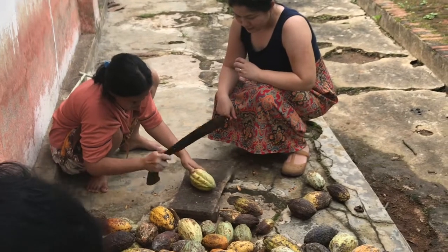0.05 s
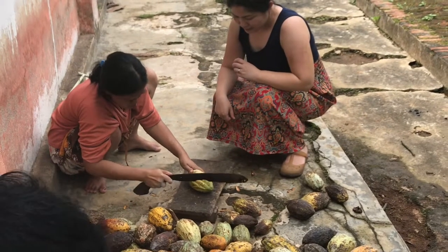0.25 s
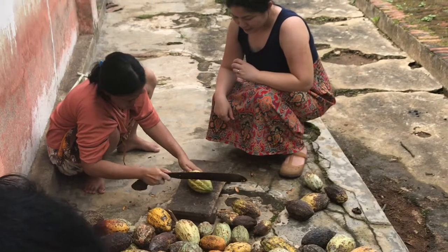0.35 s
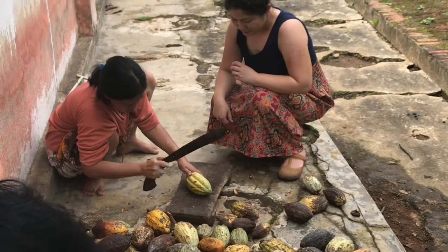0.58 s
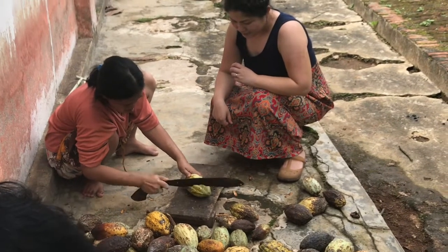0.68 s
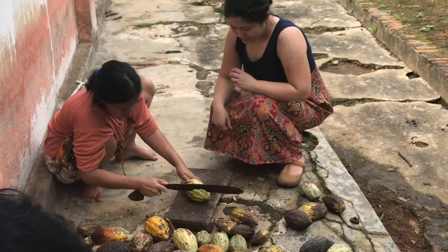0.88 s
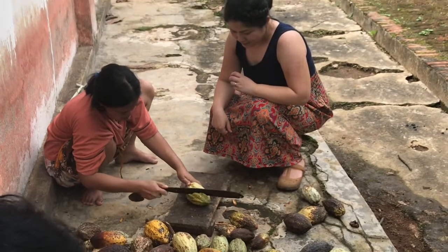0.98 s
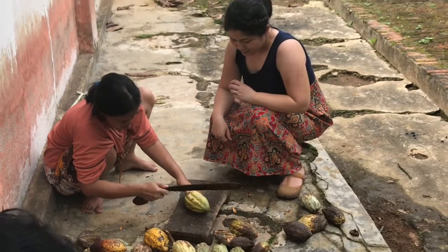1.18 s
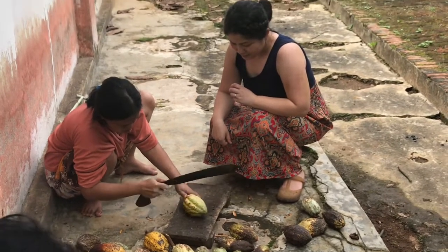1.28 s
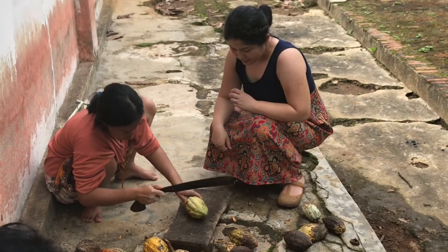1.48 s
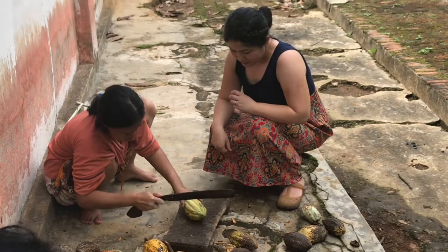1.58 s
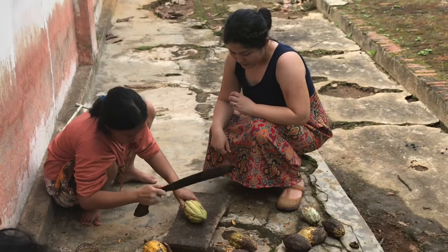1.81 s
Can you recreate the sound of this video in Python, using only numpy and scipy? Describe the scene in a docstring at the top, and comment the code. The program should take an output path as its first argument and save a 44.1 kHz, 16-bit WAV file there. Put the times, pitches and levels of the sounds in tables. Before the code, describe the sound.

Two sharp, uneven machete blows crack a hard husk, with small ticks and a faint hum

```python
"""In a paved yard a machete chops twice into a hard fruit pod held on a wooden board.
Each blow is random snaps, a split of noise and a thud of ringing modes, closely overlapping; walls answer briefly.
Small noise ticks of blade and husk come before, between and after the blows; late on, a ping of sines and soft rubs.
Throughout, a far engine hums in sines; noise bands make shrill insects, air, rustle and faint ticking."""
import sys
import numpy as np
from scipy import signal
from scipy.fft import rfft, irfft
from scipy.io import wavfile
from scipy.ndimage import uniform_filter1d

SR = 44100
rng = np.random.default_rng(int(sys.argv[2]) if len(sys.argv) > 2 else 0)


def waveform_to_disk(signal):
    """Save audio, clipped to [-1, 1], as 16-bit WAV at the path in sys.argv[1]."""
    frames = np.transpose(np.atleast_2d(signal))
    scaled = np.clip(frames, -1, 1) * 32767
    samples = np.round(scaled).astype(np.int16)
    wavfile.write(sys.argv[1], SR, samples)


N = 81585
T = np.arange(N) / SR


def from_db(db):
    """Decibels to gain."""
    return 10 ** (np.asarray(db) / 20)


def rms_one(x):
    """Scale to unit RMS level."""
    return x / np.sqrt(np.mean(x ** 2) + 1e-20)


def in_time(rows, axis=1):
    """One column of a time curve, drawn in straight lines through every sample."""
    rows = np.array(rows)
    return np.interp(T, rows[:, 0], rows[:, axis])


def at_hz(rows, hz, axis=1):
    """One column of a spectrum at given frequencies, interpolated over log frequency."""
    rows = np.array(rows)
    log_hz = np.log(np.maximum(hz, 1))
    return np.interp(log_hz, np.log(rows[:, 0]), rows[:, axis])


def dying(start, t60):
    """Sudden start, then exponential decay by 60 dB in t60 seconds."""
    age = np.maximum(T - start, 0)
    return (T >= start) * np.exp(-np.log(1000) * age / t60)


def ring(start, hz, t60):
    """A struck mode: a sine that dies away."""
    return dying(start, t60) * np.sin(2 * np.pi * hz * (T - start))


def band(x, low, high, order=2):
    """Band-pass whose upper edge stays within 9/20 of the sample rate."""
    edges = [low, min(high, SR * 9 / 20)]
    return signal.sosfilt(signal.butter(order, edges, "band", fs=SR, output="sos"), x)


def noise(low, high, order=2):
    """Band of noise at unit level."""
    return rms_one(band(rng.standard_normal(N), low, high, order=order))


def noise_around(hz, width):
    """Noise from hz / width to hz * width, never narrower than a width of 1.02."""
    width = max(width, 1.02)
    return noise(hz / width, hz * width)


def causal(x, gain):
    """Minimum-phase filter with the given gains from 0 to half the sample rate."""
    cepstrum = irfft(np.log(gain))[:N]
    response = np.exp(2 * rfft(cepstrum, 2 * N) - cepstrum[0])
    return irfft(rfft(x, 2 * N) * response)[:N]


def colour(x, rows, axis=1):
    """Give a spectrum to a sound, at unit power gain."""
    hz = np.arange(N + 1) * SR / (2 * N)
    return causal(x, rms_one(from_db(at_hz(rows, hz, axis=axis))))


def even(x, size=1200):
    """Smooth the chance peaks out of a burst's spectrum, so that it has no pitch of its own."""
    power = uniform_filter1d(np.abs(rfft(x, 2 * N)) ** 2, size)
    return causal(x, np.sqrt(power.mean() / power))


def engine():
    """Low orders of a far engine: sines at multiples of its cycle rate, each wavering in level."""
    # cycle rate: (time [s], rate [Hz])
    cycle_rate = [(0, 31.55), (.35, 30.78), (.7, 30.2), (.95, 31.57), (1.25, 30.22), (1.85, 29.68)]
    # levels of the orders: (time [s], order 2 [dB], order 3 [dB], order 4 [dB], order 5 [dB], order 6 [dB])
    order_levels = [(0, -48.5, -55.5, -58, -52.5, -62), (.2, -52, -48, -52.5, -46, -61),
                    (.5, -58.5, -51, -44, -52, -77), (.7, -50, -57, -46.5, -60, -58),
                    (.95, -54, -55.5, -57, -52, -65.5), (1.2, -54, -52.5, -52.5, -49, -59),
                    (1.45, -58.5, -61.5, -69, -53, -64.5), (1.85, -54.5, -66, -73, -57.5, -60)]
    # throb of uneven firing: (time [s], depth [share of level])
    throb_depth = [(.15, 0.065), (.32, 1), (.66, 0.85), (.85, 0.089)]
    throb_hz, throb_peak_s = 15.16, 0.4507
    waver_db, waver_hz = 1.5, 6.67   # RMS of the random points; two points per waver cycle
    cycles = np.cumsum(in_time(cycle_rate)) / SR
    throb = 1 + in_time(throb_depth) * np.cos(2 * np.pi * throb_hz * (T - throb_peak_s))
    hum = 0
    for column in range(1, len(order_levels[0])):
        order = column + 1
        waver = np.interp(T * 2 * waver_hz, np.arange(100), rng.standard_normal(100))
        tone = np.sqrt(2) * np.sin(2 * np.pi * (order * cycles + rng.random()))   # unit RMS
        level = from_db(in_time(order_levels, axis=column) + waver_db * waver)
        # order 2 alone does not throb
        hum = hum + level * tone * (throb if order > 2 else 1)
    return hum


def insects():
    """A narrow shrill band of noise, its level drifting slowly."""
    # (time [s], level [dB])
    shrill_level = [(0, -67), (.7, -70.5), (1.1, -68), (1.85, -68.5)]
    return from_db(in_time(shrill_level)) * noise(5250, 5573, order=3)


def air():
    """Outdoor rumble as steady coloured noise, with a soft rustle that swells and fades."""
    # colour of the rumble: (frequency [Hz], relative density [dB per Hz])
    air_colour = [(25, -28), (50, 6.5), (110, -3), (180, -5), (280, -10), (450, -21), (900, -23),
                  (2000, -33), (4500, -37), (8000, -53), (10500, -46.5), (14000, -32), (16000, -38)]
    # soft rustle: (time [s], level [dB])
    rustle_level = [(0, -78), (.15, -71), (.4, -63.5), (.7, -65.5), (.95, -73), (1.85, -76.5)]
    rumble = from_db(-52) * colour(rng.standard_normal(N), air_colour)
    rustle = from_db(in_time(rustle_level)) * noise(1390, 9200)
    return rumble + rustle


def interference():
    """Faint, very high and regular ticking, probably electrical: short decaying bursts of noise."""
    first_s, period_s, t60_s, level_db = 0.058, 0.1023, 0.0071, -55.5
    pulses = sum(dying(start, t60_s) for start in np.arange(first_s, T[-1], period_s))
    return from_db(level_db) * pulses * noise(11900, 15500)


def handling():
    """Ticks of blade and husk, the ping of the freed blade's modes, and the pod rubbing on the board."""
    # small ticks: (start [s], level [dB], centre [Hz], t60 [s], band edge over centre [ratio])
    tick_list = [(0.166, -51, 7000, 0.027, 2.5), (0.3832, -52, 2540, .03, 1.5),
                 (0.4595, -40.5, 5340, 0.017, 1.41), (0.4646, -50, 1980, 0.038, 1.66),
                 (0.6211, -54, 2300, 0.039, 1.6), (0.648, -54.5, 6000, 0.031, 3.3),
                 (0.6871, -44, 2950, 0.014, 1.12), (0.688, -52, 2500, 0.021, 3.5),
                 (0.9946, -52.5, 10200, 0.014, 1.23), (1.126, -56, 8260, 0.057, 3.2),
                 (1.2428, -59.5, 1440, 0.042, 1.02), (1.324, -68, 10000, 0.06, 1.2),
                 (1.471, -59, 2780, 0.032, 1.35)]
    # modes of the free blade: (frequency [Hz], level [dB], t60 [s])
    blade_modes = [(10130, -63, .15), (11690, -66, .11), (14410, -62, .11)]
    ping_s = 1.129
    # shifts of the pod: (middle [s], Gaussian spread [s], level [dB], centre [Hz],
    # band edge over centre [ratio])
    rub_list = [(1.131, 0.043, -60.5, 694, 1.45), (1.151, 0.061, -56, 342, 1.09),
                (1.438, 0.015, -63.5, 1180, 1.4), (1.46, 0.019, -67.5, 1747, 1.025),
                (1.485, 0.018, -61.5, 863, 1.076), (1.447, 0.018, -68, 4800, 1.9),
                (1.549, 0.0075, -68, 3320, 1.04), (1.551, 0.019, -67, 5000, 2.05),
                (1.562, 0.024, -63.5, 1000, 1.57)]
    ticks = sum(from_db(db) * dying(start, t60) * noise_around(hz, width)
                for start, db, hz, t60, width in tick_list)
    ping = sum(from_db(db) * ring(ping_s, hz, t60) for hz, db, t60 in blade_modes)
    rubs = sum(from_db(db) * np.exp(-.5 * ((T - middle) / spread) ** 2) * noise_around(hz, width)
               for middle, spread, db, hz, width in rub_list)
    return ticks + ping + rubs


def chops():
    """Fibres snap while the blade sinks in, the husk splits, and pod and board ring: (cracks, thuds)."""
    # blows: (start [s], crack level [dB], rise [s], tearing time [s], thud delay [s],
    # thud level [dB], split delay [s], split level [dB])
    blows = [(0.2212, -19, 0.0051, 0.0076, 0.0071, -18.5, .0052, -9),
             (0.7413, -20.5, 0.00026, 0.0081, 0.002593, -23.5, 0.0098, -19)]
    # colour of the crack: (frequency [Hz], first chop [relative dB], second chop [relative dB])
    husk_colour = [(142, -8, 4.5), (510, 12.5, 0), (1400, 1, 5), (1870, 0.5, -5), (2220, 5, -1),
                   (3150, 5.5, 3), (4960, -1.5, -3.5), (5860, 4, 6), (7860, 1.5, -4), (10900, 3, -2.5),
                   (15260, -6.5, -9)]
    # modes of pod, board and blade: (frequency [Hz], t60 [s], first chop [relative dB],
    # second chop [relative dB])
    body_modes = [(204, 0.08, -9.5, -5), (263.2, 0.1, -1.5, -21), (296.6, 0.17, -8, -9),
                  (367, 0.1, -38, -7.5), (381.3, .11, -6.5, -11.5), (434.2, 0.13, -15.5, -20),
                  (483, 0.07, -12.5, -4), (599, .125, -6, -5), (628, .15, -6.5, -13.5),
                  (670, 0.15, -13, -9.5), (722, 0.085, -5, -14), (744.6, 0.22, -19.5, -13),
                  (831, 0.043, -1, -6.5), (875, 0.059, 2.5, -3), (1026, 0.087, -23, -6.5),
                  (1278, 0.1, -14.5, -20), (1423, 0.065, -12, -0.5), (2356, 0.032, -7.5, -5),
                  (2942, 0.039, -31, -4.5), (3570, 0.041, -9, -40), (5960, .07, -24, -36),
                  (5340, 0.05, -19.5, -27), (10960, .12, -45, -24), (10550, 0.04886, -22, -30),
                  (11300, .05, -19, -5)]
    snaps_per_s, snap_spread_db = 9000, 2   # average rate; average step above the weakest snap
    crack_t60_s, split_t60_s = 0.0081, 0.0041
    contact_s = 0.00096   # the thud fades in over this time
    cracks, thuds = np.zeros((2, N))
    for k, (start, crack_db, rise, tearing, delay, thud_db, split_delay, split_db) in enumerate(blows):
        hits = (rng.random(N) < snaps_per_s / SR) * rng.choice([-1, 1], N)
        snaps = hits * from_db(snap_spread_db * np.minimum(rng.exponential(1, N), 4))
        # the force builds up, holds until the tearing ends, then dies away
        onset = np.clip((T - start) / rise, 0, 1) ** 0.89
        force = onset * from_db(-60 * np.maximum(T - start - tearing, 0) / crack_t60_s)
        tear = even(rms_one(snaps) * force)
        split = from_db(split_db) * dying(start + split_delay, split_t60_s) * noise(3800, 19845, order=1)
        cracks += from_db(crack_db) * colour(tear, husk_colour, axis=k + 1) + split
        thud_s = start + delay
        body = sum(from_db(dbs[k]) * ring(thud_s, hz, t60) for hz, t60, *dbs in body_modes)
        thuds += from_db(thud_db) * body * np.clip((T - thud_s) / contact_s, 0, 1)
    return cracks, thuds


def yard(x):
    """Quick scatter from ground and wall, then a noise tail that dies band by band."""
    # tail: (frequency [Hz], level [dB], t60 [s])
    tail_colour = [(150, -4, 0.13), (343, -7, 0.34), (620, -3.5, 0.36), (880, -9.5, 0.21),
                   (1520, -11, 0.29), (4030, -15.5, 0.34), (9100, -18.5, 0.3), (15000, -21, 0.52)]
    early_db, early_t60_s, early_delay_s = -10, 0.11, 0.004
    # sparse random reflections on 8 % of the samples
    scatter = rng.standard_normal(N) * (rng.random(N) < .08) * dying(early_delay_s, early_t60_s)
    early = band(even(scatter), 1400, 19845, order=1)
    response = from_db(early_db) * early / np.linalg.norm(early)
    edges = np.geomspace(100, 18000, 12)
    for low, high in zip(edges, edges[1:]):
        hz = np.sqrt(low * high)
        tail = noise(low, high) * dying(2 * early_delay_s, at_hz(tail_colour, hz, axis=2))
        # each band's energy goes with its width
        share = np.sqrt(2 * (high - low) / SR)
        response += from_db(at_hz(tail_colour, hz)) * share * tail / np.linalg.norm(tail)
    return signal.fftconvolve(x, response)[:N]


def scene():
    """The work on the board, the yard's answer and the background."""
    background = engine() + insects() + air() + interference()
    cracks, thuds = chops()
    bright = handling() + cracks
    answer = yard(bright + from_db(-7) * thuds)   # the thuds excite the yard less
    return (background + bright + thuds + answer)[None]


def record(dry):
    """The microphone drops the deepest bass; the top is cut steeply."""
    low_cut_hz, cutoff_hz = 30, 15800
    thin = signal.sosfilt(signal.butter(4, low_cut_hz, "high", fs=SR, output="sos"), dry)
    return signal.sosfilt(signal.ellip(10, .1, 80, cutoff_hz, fs=SR, output="sos"), thin)


dry = scene()
out = record(dry)
waveform_to_disk(out)
```